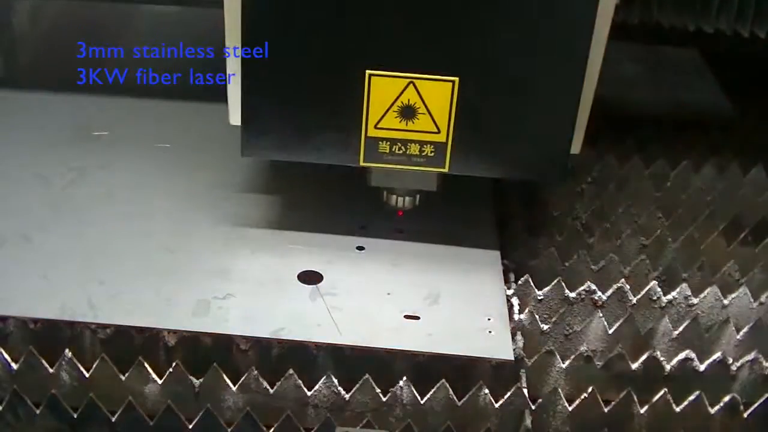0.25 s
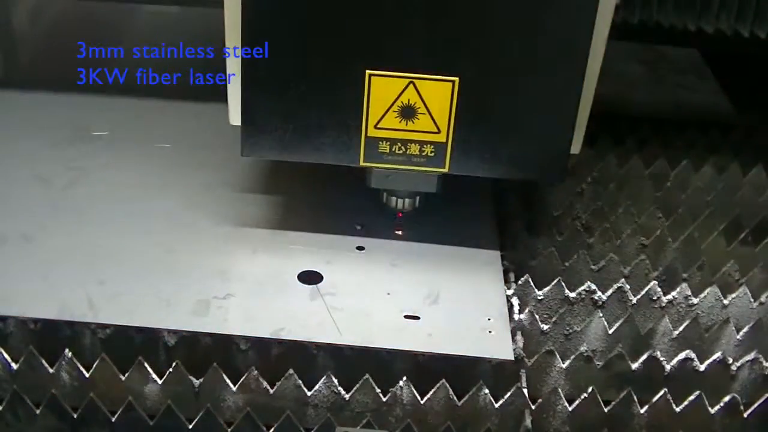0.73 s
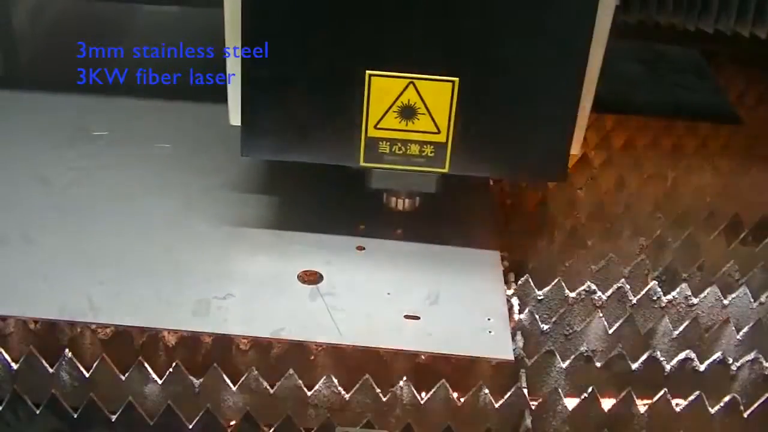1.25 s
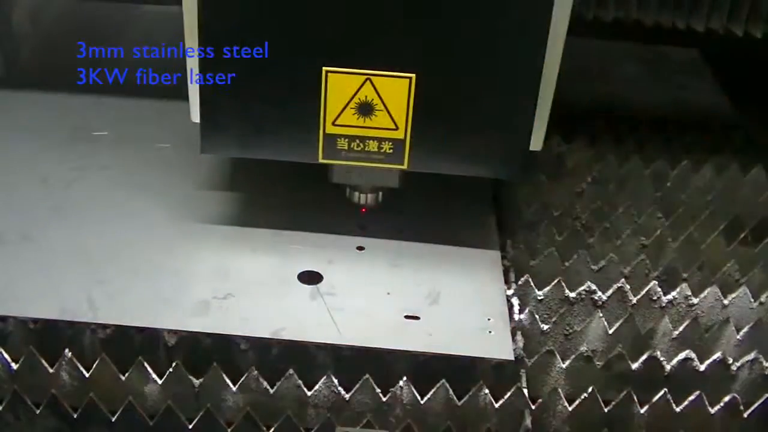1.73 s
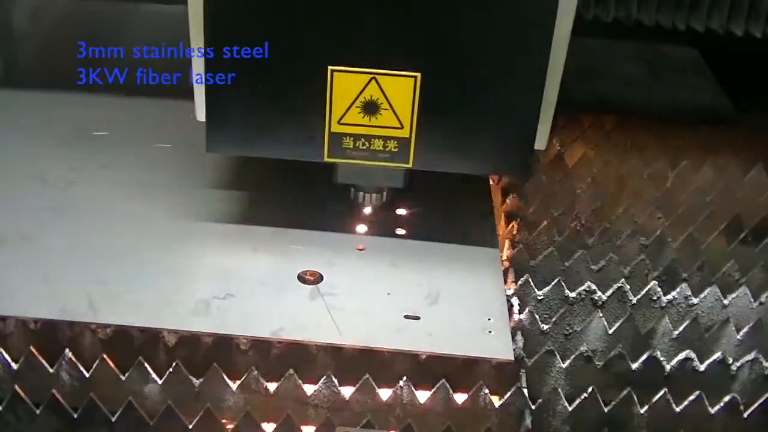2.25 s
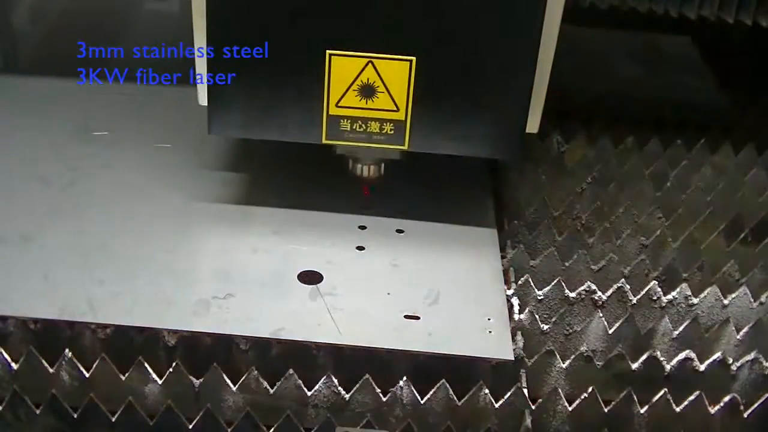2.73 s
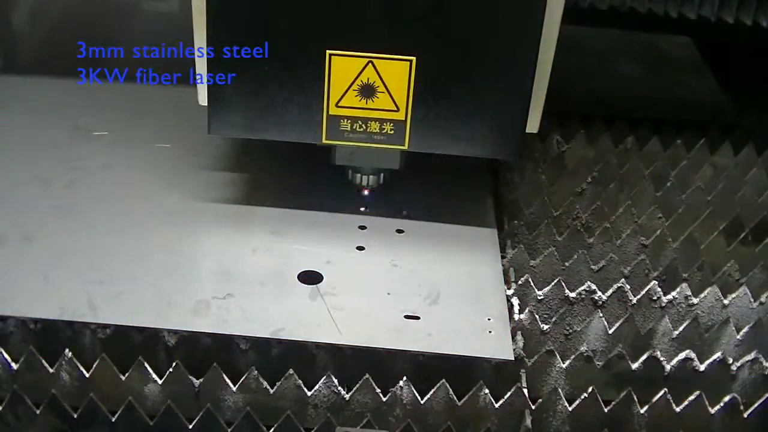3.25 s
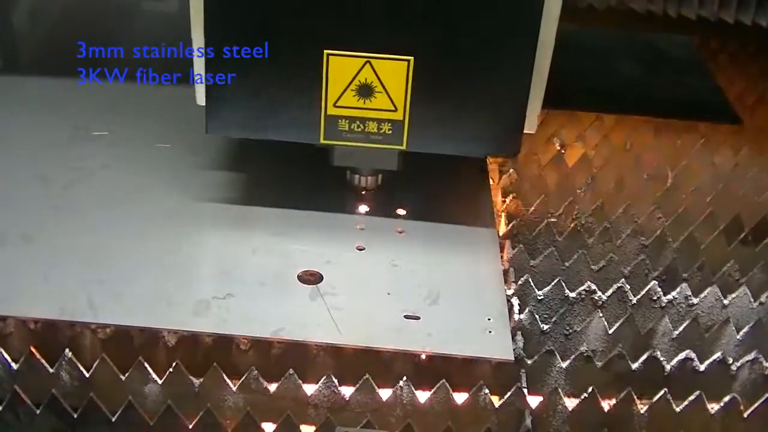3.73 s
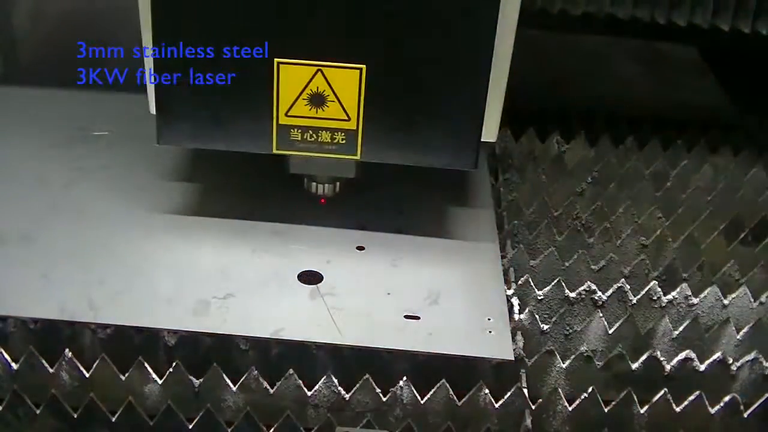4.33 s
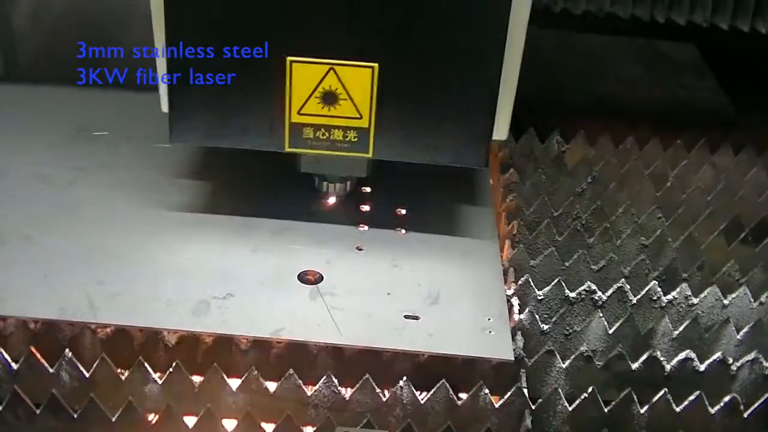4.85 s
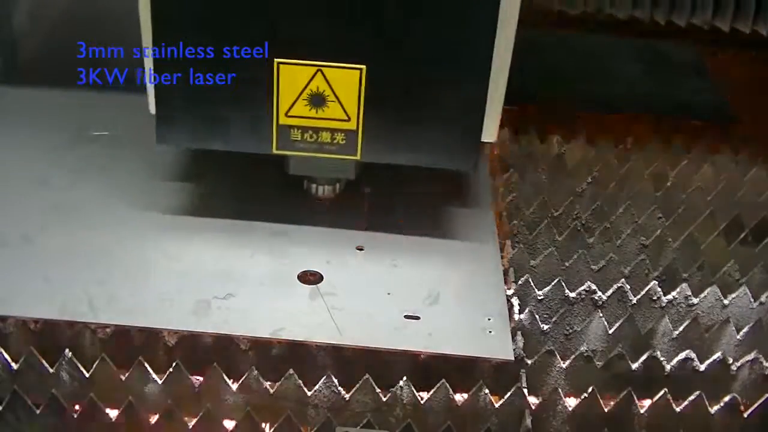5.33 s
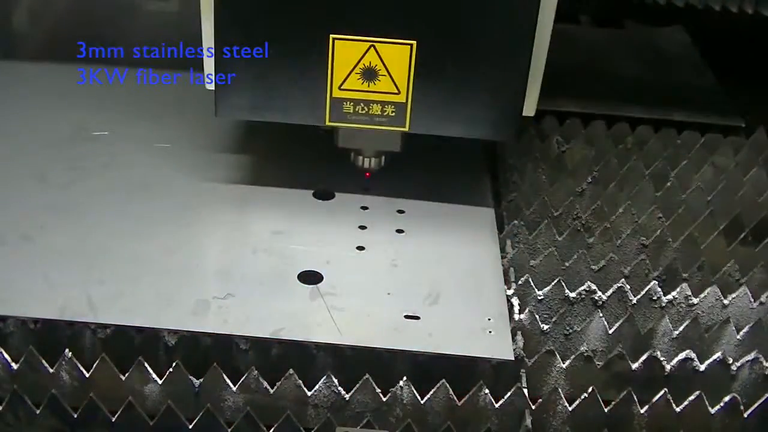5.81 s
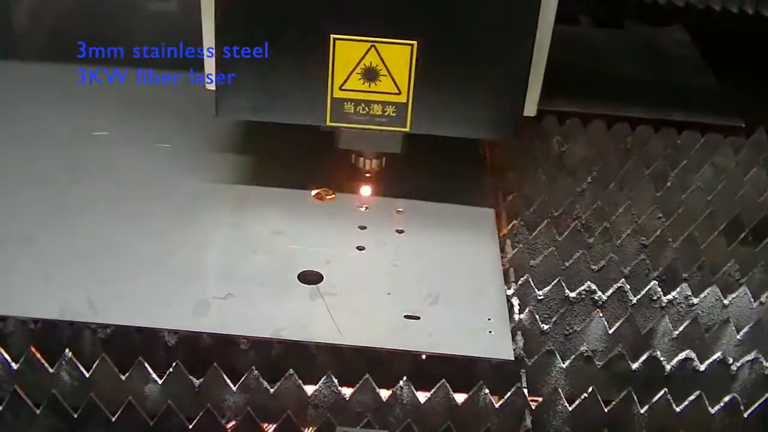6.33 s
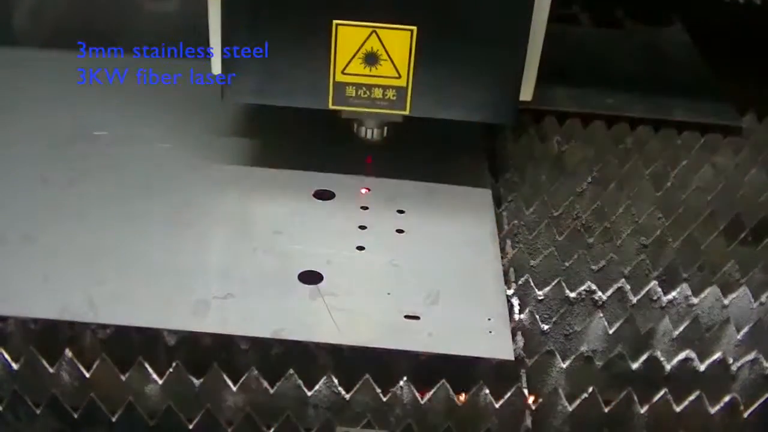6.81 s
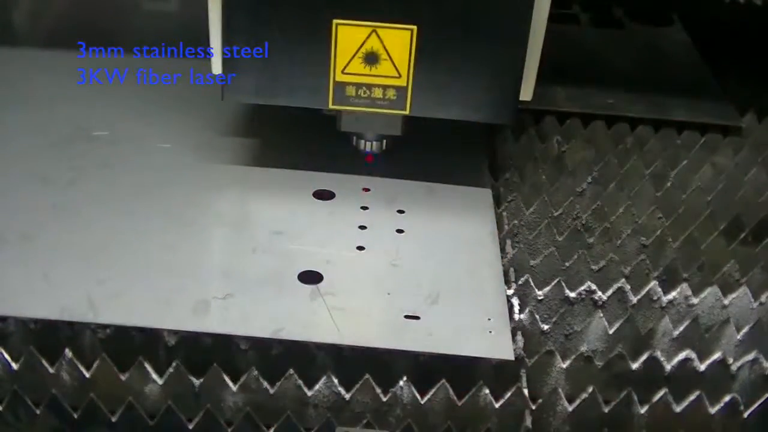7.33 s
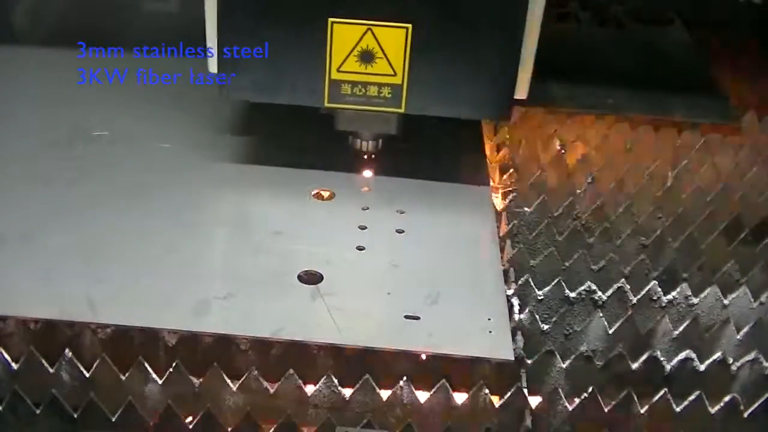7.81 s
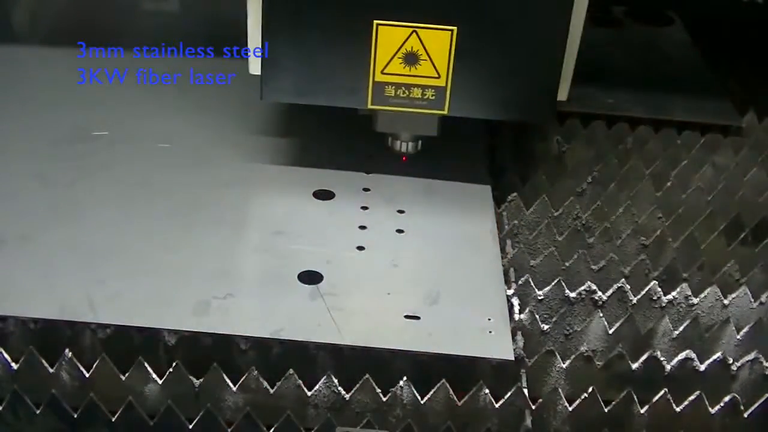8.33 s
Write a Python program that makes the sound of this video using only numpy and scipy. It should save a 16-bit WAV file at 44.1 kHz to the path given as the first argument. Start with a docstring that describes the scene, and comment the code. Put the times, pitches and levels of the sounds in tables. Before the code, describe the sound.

Bursts of hissing gas start and die away as a laser head ticks and pops through a steel sheet, over faint workshop hum.

```python
"""A jet of assist gas hisses onto sheet steel as a laser head cuts small holes. Fixed narrow
resonances colour the turbulent noise. For each hole a valve opens and the gas slaps the sheet;
the beam strikes with a tick and breaks through with a pop that sets the fresh hole howling;
then the gas dies away. The sheet thuds as it flexes, and workshop hum lies underneath.
A small two-port microphone stands close and hears the scene in stereo."""
import sys
import numpy as np
from scipy import signal
from scipy.fft import rfft, irfft, next_fast_len
from scipy.io import wavfile
from scipy.ndimage import uniform_filter1d

SR = 44100
rng = np.random.default_rng(int(sys.argv[2]) if len(sys.argv) > 2 else 0)


def unload_wav(signal):
    """Save mono or channel-first audio to the path in sys.argv[1] as 16-bit WAV at rate SR, clipped to [-1, 1]."""
    wavfile.write(
        sys.argv[1],
        SR,
        np.round(np.clip(np.atleast_2d(signal).T, -1, 1) * 32767).astype(np.int16),
    )


N = 377937

# centres of the jet's five layers, rumble, roar, rush, hiss and sizzle: f/Hz
LAYER_CENTRES = [450, 1600, 2900, 4700, 11000]
# broad spectrum of the jet: f/Hz, relative density/dB
JET_SPECTRUM = [(120, -25), (200, -41.5), (777, -12), (851, -13), (1140, -10.5), (1590, -5.5), (2420, -7.5),
                (2610, -5.5), (3370, -6), (5040, -0.5), (10700, -13.5), (14900, -21.5), (16000, -33)]
# narrow resonances of constant frequency that colour the hiss: f/Hz, width/Hz, lift/dB
HISS_RESONANCES = [(287, 8.7, 13.5), (374, 137, 8.5), (543, 20, 6), (771, 11, 6.5), (1026, 47, 5.5),
                   (1147, 60, 7), (1380, 107, 4.5), (1635, 110, 4.5), (2273, 76, 5.5), (2624, 56, 7),
                   (2946, 50, 7), (3780, 150, 4.5), (4020, 170, 3), (4740, 140, 3.5), (5000, 170, 3.5),
                   (5180, 110, 2.5), (5630, 150, 2.5), (6090, 130, 2.5), (6800, 200, 1.5), (8530, 400, 1.5),
                   (10690, 630, 5.5), (13100, 500, 6.5), (14900, 500, 6.5)]
# narrow flickering peaks in the hiss: f/Hz, standard deviation/dB
WAVER_DEPTH = [(300, 1), (1500, 2.5), (5000, 3.5), (12000, 3.5)]

# Below, "layers" stands for five columns: hiss, sizzle, roar, rumble, rush.
# the jet at each hole, the first already cut, the last just begun: layers at gas-on/dB,
# layers at break-through/dB, share of gas vented at once (0-1), shut-off delay/s
HOLE_JETS = [(-18, -30, -26, -46, -28, -18, -31, -26.5, -62, -25.5, 0.17, -0.025),
             (-17.5, -30, -28, -43, -28, -18, -30.5, -23.5, -47, -28, 0.01, -0.0017),
             (-16, -31, -28.5, -49.5, -25, -17, -30, -24, -44, -27, 0.01, -0.011),
             (-18.5, -29.5, -24.5, -45, -26, -18, -30, -23, -40.5, -28.5, 1, 0.0021),
             (-21, -27.5, -22.5, -40.5, -24, -18, -28.5, -25.5, -37.5, -28.5, 0.01, -0.0025),
             (-19.5, -28.5, -26, -34, -26.5, -17.5, -30, -27, -36, -29, 0.01, -0.0081),
             (-19.5, -28, -29.5, -33, -28.5, -17.5, -30, -28, -40.5, -29, 1, -0.002),
             (-19, -27, -28, -37, -27, -20.5, -30, -25, -42, -30, 0.01, .001)]
# while the beam pierces: t after the valve cracks open/s, change of layers/dB
PIERCING_CURVE = [(0.0, 0.34, 1.7, 2, -4, 0), (.1, 0.16, 0.1, -1.7, 3, -1.4), (.2, 0.1, -1, -3, -1.1, -0.5),
                  (.3, 0.26, 1.1, -2.5, 2.5, -0.5), (.44, -0.74, -1.5, -4, -1, 0.5),
                  (.58, -0.38, 0.1, -2.3, -0.8, .5)]
# through break-through and shut-off: t after break-through/s, change of layers/dB
CUTTING_CURVE = [(-.1, 0.0, -0.5, -1, -1, -0.5), (0.0, .5, -0.2, -1, 4.5, 0.5), (.06, 0.6, -1, -1, -2, 4.5),
                 (.14, 0.6, 0.5, -5, -9, -1), (.2, 1, -1.5, -6, -0.5, -3.5), (.27, -4, -6, -5, -7, -0.5),
                 (.33, -9.5, -7, -1.5, -12, -3.5), (.39, -40, -25, -9, -5, -12)]
# where the gas vents at once: t after break-through/s, further change of layers/dB
VENTING_CURVE = [(.11, 0.0, 0.0, -0.5, 0.0, 0.5), (.2, -6, 1.5, -4, 1, -1), (.28, -4, 2, -4, 1, -20),
                 (.36, 0, 0, -8, 1, -20)]
# brief dips and swells of the jet: t/s, hiss/dB, sizzle/dB, roar/dB, rush/dB, duration/s
DIPS_AND_SWELLS = [(0.925, -6, 0, -1.5, -4.5, 0.09), (2.2, -4.5, .1, 4, -1, .12),
                   (3.497, -7, -1.5, -3, -3, 0.077), (4.272, -1.5, -0.5, -3, -1, 0.093),
                   (4.578, -6.5, 0.5, 2, -6.5, 0.2), (4.876, -1.5, -4, -3, 1, 0.2),
                   (5.053, -3.5, 2, 2, -4, 0.26), (5.237, -1, 3.5, -0.5, -9, 0.085),
                   (5.402, 2.5, -1, -2.5, 1, .1), (6.098, -0.2, 0, -2.5, -0.5, 0.17),
                   (6.32, -7, 1, -2, -4, 0.093), (7.414, -3.5, -1, -5, -1, 0.11),
                   (7.612, -9, 1, .1, -7, 0.1), (8.158, 26, 8, 2, -1, 0.055)]
# the gas seeps, then snaps on: t after the valve cracks open/s, flow/dB
VALVE_FLOW = [(0.0, -30), (.004, -13), (.017, -11), (.025, 0.0)]
# leak through the shut valve: layers/dB
VALVE_LEAK = [-33, -45.5, -36.5, -44, -39.5]
VALVE_LEAD_S, SHUTTING_S = .022, .12   # from valve cracking to slap; time over which shut-off delay builds
EARLIER_SLAP_S, EARLIER_BREAK_S, NEXT_BREAK_S = -1.05, -.19, 9.07   # before the start and after the end

# the first gas slaps the sheet: t/s, impulse level/dB
GAS_SLAPS = [(.232, -17), (1.512, -17), (2.799, -16), (4.097, -13), (5.649, -13), (6.935, -19),
             (8.227, -19)]
# the beam breaks through: t/s, impulse level/dB
BREAKTHROUGHS = [(1.088, -10), (2.36, -12), (3.649, -8), (5.178, -14), (6.491, -15), (7.777, -9.5)]
# modes rung by slap and break-through: f/Hz, gain/dB, T60/s
POP_RING = [(1120, -6.5, .027), (1700, -2.5, .018), (2600, -9, .01), (650, -15, .03)]
# gas through the fresh hole: t/s, level/dB, final f/Hz, duration/s
HOLE_HOWLS = [(1.1, -26, 1950, .12), (2.365, -27, 1900, .12), (3.66, -27, 1850, .1), (5.24, -31, 1950, .09),
              (6.5, -28, 1900, .12), (7.79, -27.5, 1980, .13)]
# the beam strikes: t/s, impulse level/dB
BEAM_STRIKES = [(.4101, -4), (1.6802, -5), (2.9683, -4), (4.2643, -2), (5.8166, -4), (7.1027, -2),
                (8.4028, -3)]
# mode rung by the beam: f/Hz, gain/dB, T60/s
TICK_RING = [(6300, 2, .0011)]
# the sheet flexes: t/s, impulse level/dB
SHEET_FLEXES = [(1.51, -47), (2.79, -48), (3.66, -50), (5.19, -38), (6.49, -43), (6.92, -46), (7.777, -47),
                (8.225, -52)]
# low modes of the sheet: f/Hz, gain/dB, T60/s
THUD_RING = [(151, -1.5, 0.091), (348, 7, 0.072)]

# hum of fans and chillers: f/Hz, relative density/dB
SHOP_SPECTRUM = [(15, -49), (25, -9), (60, -7), (227, -4), (279, -0.5), (314, -3), (400, 0), (520, -33),
                 (880, -120)]
# the two microphone ports: f/Hz, left minus right/dB, unshared minus shared sound/dB
PORT_BALANCE = [(60, -.8, 2.5), (205, -0.5, -5.5), (350, -1.5, -12.5), (850, 0.5, -16.5), (1240, -2.3, -68),
                (2350, 1.3, -47), (2790, -1, -11), (3430, -3, -11), (4600, 0.2, -22), (5600, -5.5, -14),
                (7060, 0.5, -9.5), (9000, -4, -4), (10200, 3, -3), (11500, -4, 0), (13800, 0, -4.5),
                (14900, 3.9, -4), (15600, 1, -5)]
# phase between the ports: f/Hz, lead of the right/rad
PORT_PHASE = [(8500, 0), (9400, -.8), (10300, .8), (11400, 3.3), (12500, 4.3), (13700, 3.5), (15000, 3.2),
              (15500, 6.3)]

FFT_SIZE = next_fast_len(N)
BIN_HZ = np.maximum(np.arange(FFT_SIZE // 2 + 1) * SR / FFT_SIZE, 1)


def gas_jet(gust_db, flicker_db):
    """Turbulence radiates broadband noise; fixed narrow resonances colour the hiss."""
    hiss, sizzle, roar, rumble, rush = jet_levels()
    # all layers take the mean level of the hiss, so the spectrum sets their balance
    layers = np.array([db - np.mean(db) + np.mean(hiss) for db in (rumble, roar, rush, hiss, sizzle)])
    shape_db = at_hz(JET_SPECTRUM, BIN_HZ)
    for centre_hz, width_hz, lift_db in HISS_RESONANCES:
        shape_db += lift_db / (1 + (2 * (BIN_HZ - centre_hz) / width_hz) ** 2)
    spectrum = port_noise(shape_db)
    hiss_band = signal.butter(4, [3200, 7000], "band", fs=SR, output="sos")
    hiss_rms = np.std(signal.sosfilt(hiss_band, irfft(spectrum.mean(axis=0), FFT_SIZE)))
    jet, gust = np.zeros((2, N)), drift(rate_hz=15)
    layer_index = np.arange(len(layers))
    for centre_hz in 200 * 2 ** np.arange(0, 6.6, .5):   # half-octave steps; neighbouring windows sum to 1
        window = np.cos(np.pi * np.clip(np.log2(BIN_HZ / centre_hz), -.5, .5)) ** 2
        place = np.interp(np.log(centre_hz), np.log(LAYER_CENTRES), layer_index)
        share = np.clip(1 - np.abs(place - layer_index), 0, 1)   # a band follows its nearest layers
        level_db = share @ layers + gust_db * gust + flicker_db * drift(rate_hz=3.2)
        jet += from_db(level_db) * irfft(spectrum * window, FFT_SIZE)[:, :N]
    return waver(jet / hiss_rms)


def jet_levels():
    """Jet noise follows the flow: five layer levels in dB as each hole is opened, pierced and cut."""
    t = np.arange(N) / SR
    opens = np.array([EARLIER_SLAP_S] + [s for s, db in GAS_SLAPS]) - VALVE_LEAD_S
    breaks = np.array([EARLIER_BREAK_S] + [s for s, db in BREAKTHROUGHS] + [NEXT_BREAK_S])
    hole = np.searchsorted(opens, t) - 1
    since_open, since_break = t - opens[hole], t - breaks[hole]
    columns = np.array(HOLE_JETS)[hole].T
    start_db, end_db, vented, delay_s = columns[:5], columns[5:10], columns[10], columns[11]
    progress = np.clip(since_open / (breaks - opens)[hole], 0, 1)
    level_db = start_db + progress * (end_db - start_db) + at_time(PIERCING_CURVE, since_open)
    cutting_s = since_break - delay_s * np.clip(since_break / SHUTTING_S, 0, 1)
    level_db += at_time(CUTTING_CURVE, cutting_s) + vented * at_time(VENTING_CURVE, cutting_s)
    for s, hiss_db, sizzle_db, roar_db, rush_db, duration in DIPS_AND_SWELLS:
        bump = np.exp(-4 * ((t - s) / duration) ** 2)
        level_db += np.outer([hiss_db, sizzle_db, roar_db, 0, rush_db], bump)
    flow = from_db(level_db + at_time(VALVE_FLOW, since_open))
    return 10 * np.log10(flow ** 2 + from_db(VALVE_LEAK)[:, None] ** 2)   # flow and leak add in power


def waver(jet):
    """Random amplitude modulation: narrow peaks and dips come and go in the hiss."""
    hz, _, cells = signal.stft(jet, SR, nperseg=2048)
    flicker = uniform_filter1d(rng.standard_normal(cells.shape[1:]), size=2, axis=0)   # across frequency
    flicker = unit_rms(uniform_filter1d(flicker, size=4, axis=1))   # across time
    depth_db = at_hz(WAVER_DEPTH, np.maximum(hz, 1))[:, None]
    excess_db = depth_db ** 2 * np.log(10) / 20   # mean power the modulation would add
    return signal.istft(cells * from_db(depth_db * flicker - excess_db), SR, nperseg=2048)[1][:, :N]


def pops():
    """Impulse excitation: the slap of the gas and the break-through ring the same damped modes."""
    return ring_modes(BREAKTHROUGHS + GAS_SLAPS, POP_RING)


def hole_howls(width_hz, start_ratio):
    """Flow-excited resonance: gas in the fresh hole gives narrow-band noise that rises as the hole opens."""
    howls = np.zeros(N)
    radius = np.exp(-np.pi * width_hz / SR)
    for s, level_db, final_hz, duration in HOLE_HOWLS:
        progress = np.linspace(0, 1, round(duration * SR))
        pitch_hz = final_hz * (start_ratio + (1 - start_ratio) * np.sqrt(progress))
        phase = 2 * np.pi * np.cumsum(pitch_hz) / SR
        wobble = lowpass_noise(radius, (2, 9000))[:, -len(progress):]
        tone = unit_rms(wobble[0] * np.cos(phase) + wobble[1] * np.sin(phase))
        envelope = np.sqrt(np.sin(np.pi * progress) + 1e-9)
        start = round(s * SR)
        howls[start:start + len(tone)] += from_db(level_db) * envelope * tone
    return howls


def beam_ticks():
    """Heavy damping: the beam's strike rings one high mode so briefly that it ticks, right of centre."""
    return ring_modes(BEAM_STRIKES, TICK_RING) * from_db([[-1.5], [1.5]])


def sheet_thuds():
    """Free vibration of a plate: the flexing sheet thuds in its low modes."""
    return ring_modes(SHEET_FLEXES, THUD_RING)


def workshop_hum(level_db, sway_db):
    """Amplitude-modulated low-frequency noise: the uneven hum of fans and chillers."""
    spectrum = port_noise(at_hz(SHOP_SPECTRUM, BIN_HZ))
    hum = unit_rms(irfft(spectrum, FFT_SIZE)[:, :N])
    return from_db(level_db + sway_db * drift(rate_hz=5.2)) * hum


def ring_modes(events, modes):
    """Modal superposition: each impulse starts one exponentially decaying sinusoid per mode."""
    impulses = np.full(N, 1e-18)
    impulses[[round(s * SR) for s, db in events]] = from_db([db for s, db in events])
    sound = np.zeros(N)
    for hz, gain_db, t60 in modes:
        radius, angle = from_db(-60 / (t60 * SR)), 2 * np.pi * hz / SR
        ring = signal.lfilter([0, np.sin(angle)], [1, -2 * radius * np.cos(angle), radius ** 2], impulses)
        highpass = signal.butter(2, hz / 2, "high", fs=SR, output="sos")   # leaves no static pressure
        sound += from_db(gain_db) * signal.sosfilt(highpass, ring)
    return sound


def port_noise(shape_db):
    """Partial coherence: noise spectra at two ports share one part and differ in level and phase."""
    shared, unshared = rfft(rng.standard_normal((2, N)), FFT_SIZE) * from_db(shape_db)
    unshared_gain = from_db(at_hz(PORT_BALANCE, BIN_HZ, column=2))
    side = np.array([[1], [-1]])   # left, right
    pair = (shared + side * unshared_gain * unshared) / np.sqrt(1 + unshared_gain ** 2)
    balance = from_db(side * at_hz(PORT_BALANCE, BIN_HZ) / 2)
    return pair * balance * np.exp(-.5j * side * at_hz(PORT_PHASE, BIN_HZ))


def drift(rate_hz):
    """Slow random fluctuation of unit rms: low-passed noise, interpolated between coarse steps."""
    step = 40   # samples
    radius = np.exp(-2 * np.pi * rate_hz * step / SR)
    slow = lowpass_noise(radius, N // step + 2002)[2000:]
    return np.interp(np.arange(N) / step, np.arange(len(slow)), unit_rms(slow))


def lowpass_noise(radius, shape):
    """White noise through a double real pole: the nearer its radius is to 1, the narrower the band."""
    return signal.lfilter([1], [1, -2 * radius, radius ** 2], rng.standard_normal(shape))


def at_hz(table, hz, column=1):
    """Interpolation of a spectrum table on a logarithmic frequency axis."""
    table = np.array(table)
    return np.interp(np.log(hz), np.log(np.maximum(table[:, 0], 1)), table[:, column])


def at_time(table, t):
    """Linear interpolation of each level column at the times t."""
    times, *columns = np.transpose(table)
    return np.array([np.interp(t, times, column) for column in columns])


def from_db(db):
    """Amplitude ratio of a level in decibels."""
    return 10 ** (np.asarray(db) / 20)


def unit_rms(x):
    """Normalisation to unit mean power."""
    return x / np.sqrt(np.mean(x ** 2) + 1e-20)


def scene():
    """Linear superposition: the pressures of jet, beam, sheet and workshop add at each port."""
    howls = hole_howls(width_hz=220, start_ratio=.9)
    jet = gas_jet(gust_db=.5, flicker_db=.23)
    return jet + pops() + howls + beam_ticks() + sheet_thuds() + workshop_hum(level_db=-56.5, sway_db=2.5)


def record(dry):
    """Soft saturation rounds the highest peaks; a steep low-pass limits the bandwidth."""
    ceiling, cutoff_hz = .93, 15820
    rounded = dry / (1 + (dry / ceiling) ** 6) ** (1 / 6)
    return signal.sosfilt(signal.ellip(14, .3, 70, cutoff_hz, fs=SR, output="sos"), rounded)


dry = scene()
out = record(dry)
unload_wav(out)
```